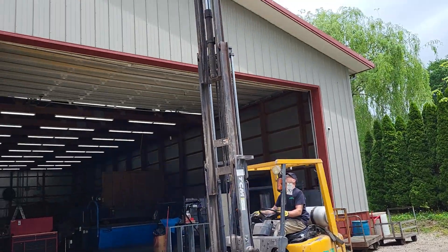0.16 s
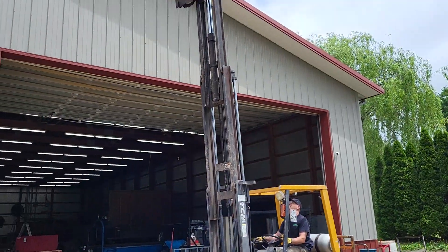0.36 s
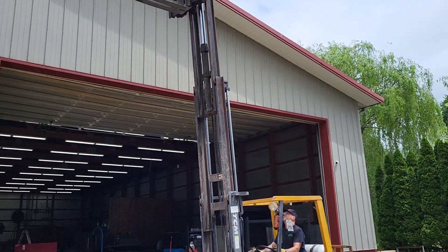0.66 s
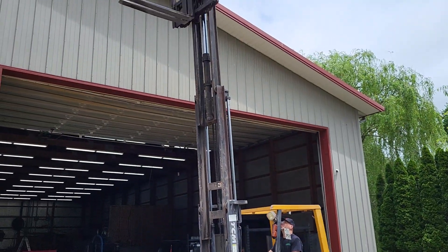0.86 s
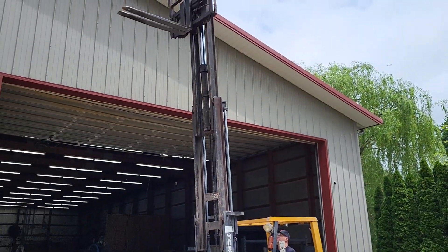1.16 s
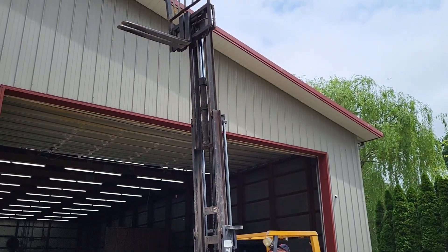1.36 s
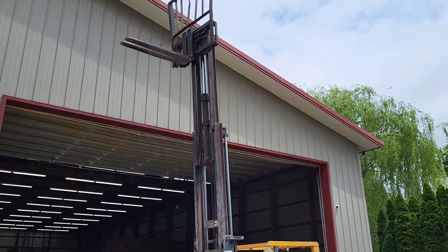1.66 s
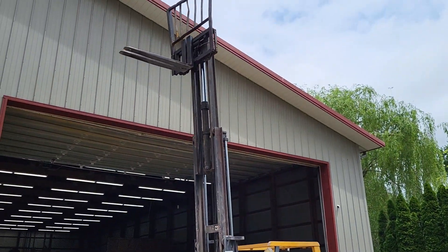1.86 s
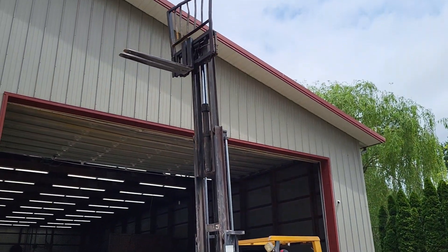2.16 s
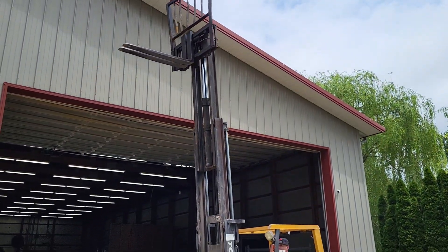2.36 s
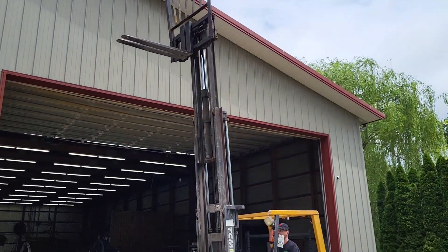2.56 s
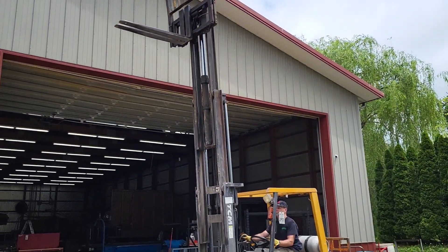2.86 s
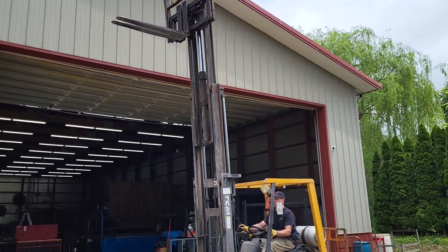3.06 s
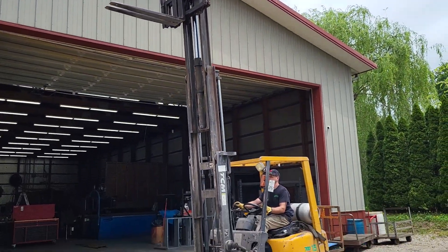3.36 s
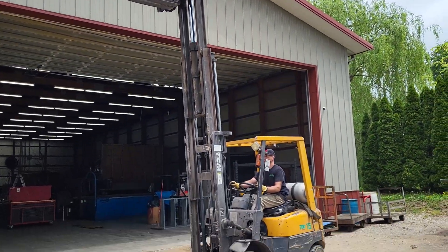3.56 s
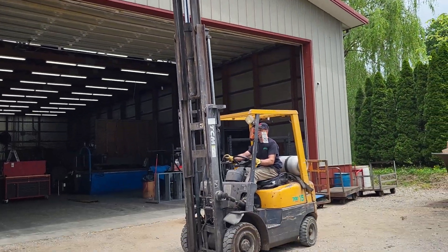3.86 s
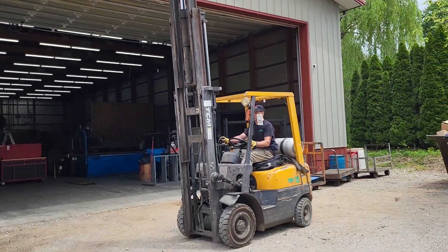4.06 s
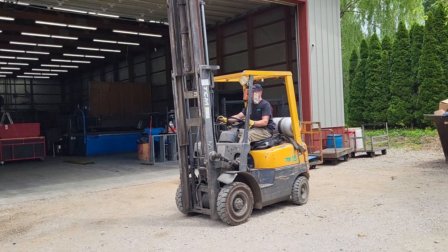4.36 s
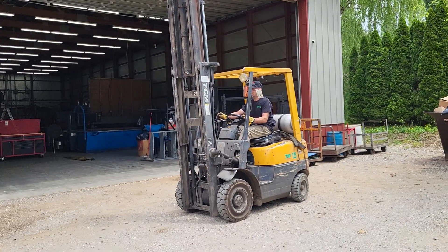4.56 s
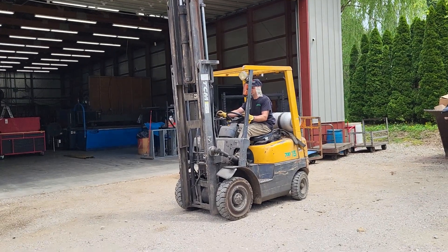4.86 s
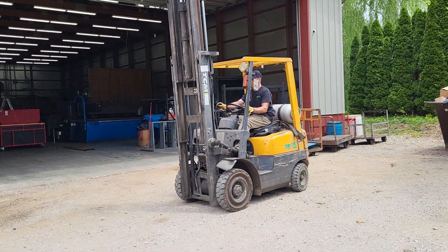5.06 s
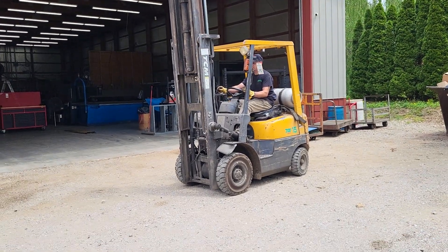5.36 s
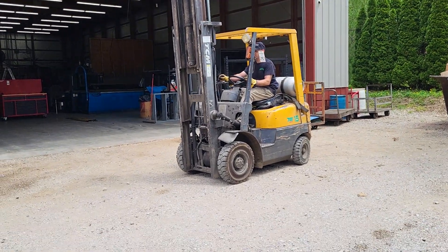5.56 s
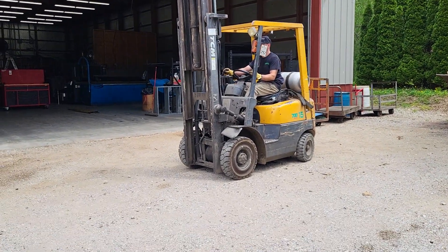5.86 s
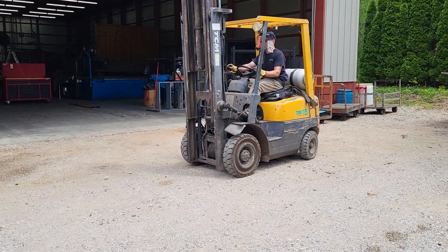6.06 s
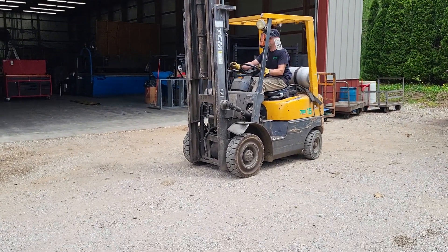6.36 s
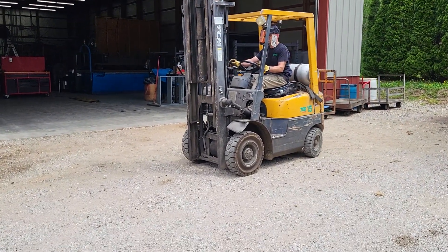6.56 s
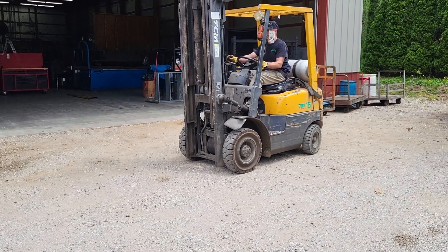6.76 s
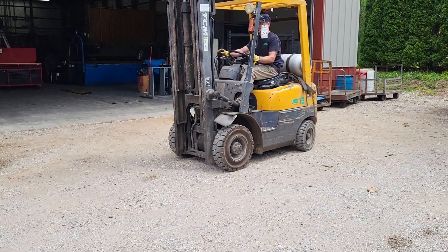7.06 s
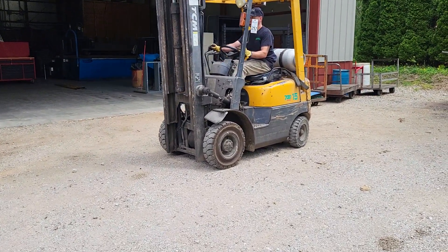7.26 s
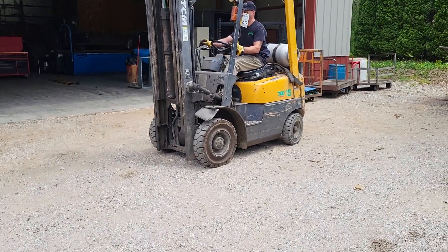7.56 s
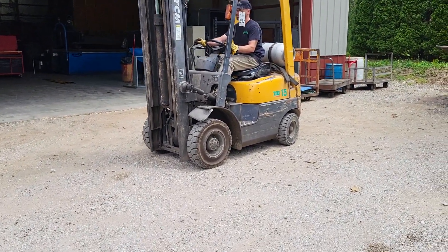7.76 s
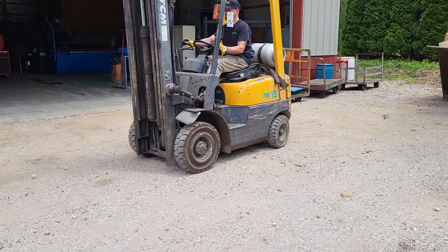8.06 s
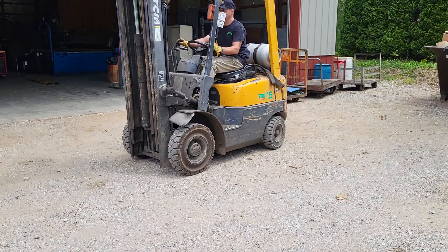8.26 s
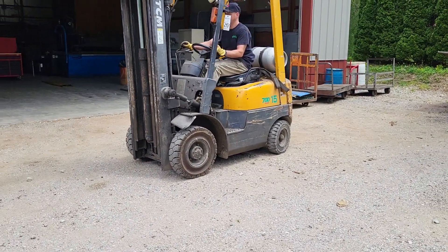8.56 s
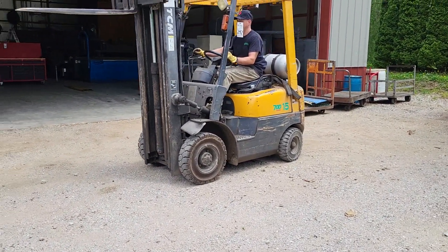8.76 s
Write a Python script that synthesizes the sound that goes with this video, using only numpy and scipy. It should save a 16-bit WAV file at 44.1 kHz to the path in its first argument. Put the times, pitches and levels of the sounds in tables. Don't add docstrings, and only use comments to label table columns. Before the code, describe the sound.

A forklift motor strains upward in pitch, exhaust ringing, fan humming, and intake hissing, with a cluster of metallic clanks in the first second or so. It holds high, then is let off and slides down in about two seconds, burning unevenly before evening out. A steady, puttering idle continues to the end, with small clicks and faint high roller squeaks. Open yard before a shed, microphone fairly near, light echo.

```python
import sys
import numpy as np
from scipy import signal
from scipy.fft import rfft, irfft, next_fast_len
from scipy.io import wavfile

SR = 44100
rng = np.random.default_rng(int(sys.argv[2]) if len(sys.argv) > 2 else 0)


def invert_db(x):
    u = np.asarray(x, float) / 20
    return 10 ** u


def put_to_file(sound):
    columns = np.atleast_2d(sound).T
    safe = np.clip(columns, -1, 1)
    whole_steps = np.round(safe * 32767)
    wavfile.write(sys.argv[1], SR, whole_steps.astype(np.int16))


N = 392931

# time in seconds, firing rate in Hz, exhaust pulse level in dB.
REVS = [(0, 51.8, -19), (.55, 62.12, -19), (1.17, 66.61, -18.5), (1.95, 70.95, -18), (2.3, 72.86, -17.5),
        (3.28, 75.53, -17.5), (3.4, 71.65, -19.5), (3.67, 63.95, -16), (3.82, 58.76, -20.5),
        (4.0, 54.75, -21), (4.2, 49.14, -27), (4.47, 44.53, -26), (4.81, 38.83, -23), (5.26, 35.13, -17),
        (5.5, 33.48, -16), (5.95, 31.01, -18.5), (6.2, 30.41, -17), (8.91, 30.37, -17)]
IDLE_HZ, FULL_HZ = 30, 75
# time in seconds, spread of burn strength in dB.
MISFIRE = [
    (0, .7),
    (3.3, .7),
    (3.4, 3),
    (4.0, 3),
    (4.15, 4.5),
    (4.65, 4.5),
    (4.9, 2.5),
    (5.4, 1),
    (8.91, .7),
]
# pulse in dB, lag in ms, kick into the pipe in dB.
CYLINDERS = [(7, -0.099, -12.5), (8.5, 0.16, -1), (7.5, -0.48, -29), (4.5, 0.18, -32)]
# pitch in Hz, width in Hz, level at idle in dB, level at full revs in dB.
PIPE = [(190, 35, -13, -4.5), (224.6, 12.5, 5, -2), (261, 29.8, -10.5, -0.5), (312.7, 28, -10.5, -5.5),
        (348, 14.3, -9.5, -4.5), (420.4, 13, -26.5, -6), (514.6, 22, -51, -18)]
RING_IDLE_DB, RING_FULL_DB = -1.27, -3
RING_GAIN_DB = 0.93

BOOM_PHASE = [0.15, 0.1]
# firing rate in Hz, level in dB.
FIRST_ORDER = [(30, -61), (40, -36), (50, -28), (58.5, -8.5), (61.7, -12.5), (64.5, -20.5), (70.5, -24),
               (75.5, -22)]
# firing rate in Hz, level in dB.
SECOND_ORDER = [(30.4, -18.5), (34.5, -25), (39.5, -1), (42.5, -26), (53, -27.5), (63.5, -31.5),
                (66.5, -19), (75.5, -22)]
UNBURNT_LOSS_DB = 9.5
GULP_S, GULP_LENGTH_S, GULP_DB = 3.4, 0.11, 11.5

# multiple of firing rate, resonance in Hz, width in Hz, level in dB.
SINGING = [(2.999, 226.5, 44.3, -19.5), (3.251, 257, 50, -29.5), (3.5, 276.4, 30.2, -22),
           (3.749, 272.7, 24.8, -23), (4.001, 244, 45.8, -24.5)]
SINGING_LOSS_DB = 4

# multiple of firing rate, level in dB.
WHINE = [(21.9, 1), (28, -4.5), (29.2, -11), (35, -8.5), (36.5, -8.5), (42, -1), (43.8, -4.5), (51.1, -0.5),
         (54.6, -6)]
# pitch in Hz, width in Hz, level in dB.
HOOD = [(1290, 160, -16), (1642, 75, -5), (3380, 200, -25)]
# multiple of firing rate, housing pitch in Hz, width in Hz, level in dB.
PUMP = (28, 2050, 178.5, -7)
# time in seconds, whine level in dB.
LOAD = [(0, -55), (.62, -31), (3.3, -28.5), (3.85, -23.5), (4.74, -29), (4.95, -44.5), (5.63, -34.5),
        (6.11, -59.5), (7.6, -47), (8.0, -40.5), (8.45, -39), (8.7, -50)]

FAN_ORDER = 7.3
# harmonic number, level over the clatter in dB.
FAN_TONES = [(1, -16), (2, -17), (3, -23), (4, -24)]

# frequency in Hz, density in dB per Hz.
CLATTER = [(280, 12.5), (450, 4), (590, -8.5), (805, 2), (1500, -1.5), (1640, 5), (1850, -8), (2070, 2.5),
           (2540, -13.5), (3200, -30), (4160, -47.5), (7040, -120)]
CLATTER_IDLE_DB, CLATTER_FULL_DB = -37.5, -24.5
# frequency in Hz, density in dB per Hz.
HISS = [(1410, -30), (2400, 0.5), (2860, -30), (3170, -10.5), (4640, -7), (5840, -8.5), (6790, -8.5),
        (8610, -24), (12500, -24), (16000, -27)]
HISS_SHUT_DB, HISS_OPEN_DB = -61, -43
# time in seconds, share from 0 to 1.
INTAKE = [
    (0, 0.96),
    (3.47, 1),
    (4.0, .5),
    (5.05, 0.12),
    (5.6, 0.44),
    (8.91, 0.36),
]
# pitch in Hz, width in Hz, level in dB.
PANELS = [(905, 190, -11.5), (1290, 55, -0.5), (1645, 5.7, -7), (2020, 120, -11), (3970, 69, -20),
          (5730, 80, -16.5)]

# start in seconds, peak in dB, length in seconds, brightness in dB.
CLANKS = [(0.24, -33, 0.025, -3.5), (0.344, -42, 0.0086, 4), (0.408, -24.5, 0.041, 1.5),
          (0.439, -15.5, 0.032, -3.5), (0.462, -14, 0.0088, -3.5), (0.559, -25.5, 0.018, 8),
          (0.709, -35.5, 0.03, 14), (0.873, -40, 0.048, 9.5), (1.136, -33, 0.015, 7),
          (1.174, -12, .02, -10), (4.479, -41, .03, 6), (5.765, -36, .02, 2), (7.8, -36, .012, 0),
          (8.55, -36, .012, 0), (6.841, -33, 0.011, -0.5), (6.914, -33, 0.0065, 1.5),
          (7.135, -34, 0.008, 2), (8.723, -41.5, 0.0068, 11), (8.805, -35, 0.0028, 5.5)]
# pitch in Hz, width in Hz, level in dB.
MAST = [(665, 130, 1.5), (1405, 64, 6.5), (1850, 168, 4), (2274, 330, -1), (4180, 2000, -15),
        (6280, 1500, -15), (13500, 2000, -33)]
# delay in ms, level in dB.
SHED_ECHOES = [(23, -2.5), (41, -14), (67, -24.5), (96, -32)]

# start in seconds, length in seconds, pitch in Hz, level in dB.
SQUEAKS = [
    (1.45, 0.048, 13500, -61),
    (1.483, 0.023, 9000, -47),
    (1.97, 0.045, 13400, -59.5),
    (2.115, .045, 13960, -70),
    (7.18, 0.012, 15800, -62.5),
    (7.74, 0.09, 13550, -59),
    (7.86, 0.12, 14700, -49.5),
    (8.02, 0.16, 14500, -55),
    (8.05, .14, 7500, -59),
]
# start in seconds, length in seconds, pitch in Hz, level in dB.
WHISTLES = [
    (1.15, 0.3, 15400, -71),
    (5.12, 0.11, 13950, -81),
]
# start
# in seconds, length in seconds, pitch in Hz, level in dB.
RUSTLES = [(0, .3, 1290, -32), (.2, .25, 1290, -32), (7.85, .3, 14700, -59), (1.14, .25, 10300, -53.5),
           (1.15, .24, 11900, -54.5), (5.62, .09, 13500, -65), (5.62, .09, 7740, -60),
           (6.25, .015, 11760, -66), (7.02, 0.028, 13100, -62), (7.22, .012, 12800, -62.5),
           (8.48, 0.02, 13450, -55), (8.81, 0.043, 14800, -56.5), (8.791, 0.023, 7600, -50)]
SQUEAK_WIDTH, SQUEAK_RISE, WHISTLE_WIDTH, RUSTLE_WIDTH = .035, .055, 0.055, 0.14

# frequency in Hz, density in dB per Hz.
AIR = [(1470, -28.5), (2500, -5), (3660, -9), (4020, -10), (5650, -21), (6350, -37.5), (7420, -21.5),
       (14000, -23.5), (16000, -20.5)]
AIR_DB = -49.5
# frequency in Hz, left-right likeness from 0 to 1.
LIKENESS = [(60, 0.75), (250, 1), (500, 0.73), (1000, 0.64), (2000, 0.39), (4000, 0.021), (8000, 0.018),
            (14000, 0.02)]
LEFT_DB = .35


def rms_one(x):
    return x / np.sqrt(np.mean(x ** 2) + 1e-20)


def in_time(rows):
    s, *columns = np.transpose(rows)
    return [np.interp(np.arange(N) / SR, s, c) for c in columns]


def at_hz(points, hz):
    table_hz, db = np.transpose(points)
    return np.interp(np.log(hz), np.log(table_hz), db)


def with_revs(idle, full, firing):
    return idle + (full - idle) * (firing - IDLE_HZ) / (FULL_HZ - IDLE_HZ)


def drift(rate):
    r = np.exp(-80 * np.pi * rate / SR)
    slow = signal.lfilter([1], [1, -2 * r, r * r], rng.standard_normal(N // 40 + 2002))[2000:]
    return np.interp(np.arange(N) / 40, np.arange(len(slow)), rms_one(slow))


def resonate(x, hz, width_hz):
    r = np.exp(-np.pi * width_hz / SR)
    poles = [1, -2 * r * np.cos(2 * np.pi * hz / SR), r * r]
    return signal.lfilter(np.array([1, 0, -1]) * (1 - r * r) / 2, poles, x + 1e-18)


def body(x, modes):
    return sum((-1) ** k * invert_db(db) * resonate(x, hz, width) for k, (hz, width, db) in enumerate(modes))


def stereo_noise(spectrum, patchy_db):
    size = next_fast_len(N)
    hz = np.maximum(np.fft.rfftfreq(size, 1 / SR), 1)
    alike = np.clip(at_hz(LIKENESS, hz), 0, 1)
    coloured = rfft(rng.standard_normal((2, size))) * invert_db(at_hz(spectrum, hz))
    mid, side = coloured * np.sqrt([1 + alike, 1 - alike])
    left_right = np.array([mid + side, mid - side])
    together = drift(7.2)
    edges = np.geomspace(spectrum[0][0], spectrum[-1][0], 5)
    out = 0
    for low, high in zip(edges, edges[1:]):
        band = irfft(left_right * ((hz >= low) & (hz < high)), size)[:, :N]
        out = out + band * invert_db(patchy_db * (.8 * together + drift(14.0)))
    return rms_one(out)


def boom_levels(firing):
    gulp = np.exp(-((np.arange(N) / SR - GULP_S) / GULP_LENGTH_S) ** 2)
    uneven_db = in_time(MISFIRE)[0]
    first_db = at_hz(FIRST_ORDER, firing) + GULP_DB * gulp
    second_db = at_hz(SECOND_ORDER, firing) - UNBURNT_LOSS_DB * (uneven_db - uneven_db.min())
    return first_db, second_db


def silencer_boom(turns, firing):
    boom = np.zeros(N)
    for k, db in enumerate(boom_levels(firing)):
        order = np.cos(2 * np.pi * (k + 1) * turns - BOOM_PHASE[k])
        boom += np.sqrt(2) * invert_db(db + 2.2 * drift(11.0)) * order
    return boom


def exhaust(turns, firing, pulse_db):
    at = np.flatnonzero(np.diff(np.floor(turns)))
    chance = rng.standard_normal((len(at), 3))
    misfire_db = in_time(MISFIRE)[0]
    revs = with_revs(0, 1, firing)
    cylinder_db, lag_ms, kick_db = np.array(CYLINDERS)[np.arange(len(at)) % 4].T
    lag = (lag_ms + .1 * misfire_db[at] * chance[:, 1]) * SR / 1000
    at_late = np.clip(at + lag.astype(int), 0, N - 1)

    slugs, kicks, ring = np.zeros((3, N))
    slugs[at_late] = invert_db(cylinder_db + misfire_db[at] * chance[:, 0]) / np.sqrt(firing[at])
    slugs = signal.sosfiltfilt(signal.butter(2, [66, 235], "band", fs=SR, output="sos"), slugs)
    slugs = slugs + 0.67 * resonate(slugs, 97.6, 16)

    for k, (hz, width, idle_db, full_db) in enumerate(PIPE):
        uneven = np.roll(kick_db, k) * (1 - 0.4 * revs[at])
        kicks[at_late] = invert_db(uneven + misfire_db[at] * chance[:, 2]) / np.sqrt(firing[at])
        mode = resonate(resonate(kicks, hz, width), hz, 4 * width)
        ring += invert_db(with_revs(idle_db, full_db, firing)) * mode
    ring_db = with_revs(RING_IDLE_DB, RING_FULL_DB, firing) + RING_GAIN_DB * misfire_db

    rumble = rms_one(resonate(resonate(rng.standard_normal(N), 170, 85), 190, 99))
    blast = invert_db(-2.0) * rms_one(slugs) + invert_db(ring_db - 3.0) * rms_one(ring)
    return invert_db(pulse_db) * (blast + invert_db(-13 + 2.94 * misfire_db) * rumble)


def singing(turns, firing):
    even = np.sqrt(2) * invert_db(1.1 * drift(2.7) - SINGING_LOSS_DB * in_time(MISFIRE)[0])
    orders = np.zeros(N)
    for k, hz, width, db in SINGING:
        closeness = 1 / (1 + (2 * (k * firing - hz) / width) ** 2)
        orders += invert_db(db) * closeness * np.cos(2 * np.pi * k * turns)
    return even * orders


def whine(turns, whine_db):
    turns = turns + .002 * drift(5.0)
    tones = sum(invert_db(db + 2.0 * drift(3.2)) * np.sin(2 * np.pi * k * turns) for k, db in WHINE)
    multiple, hz, width_hz, db = PUMP
    gear = np.sin(2 * np.pi * multiple * turns)
    pump = invert_db(db + 0.67 * drift(3.2)) * resonate(resonate(gear, hz, width_hz), hz, width_hz)
    hood = sum(invert_db(db) * resonate(resonate(tones, hz, width), hz, 1.6 * width) for hz, width, db in HOOD)
    return invert_db(whine_db) * (hood + pump) * 2


def fan(turns, clatter_db):
    turns = turns + .012 * drift(6.0)
    tones = np.zeros(N)
    for k, db in FAN_TONES:
        tones += invert_db(db + 4.0 * drift(5.0)) * np.sin(2 * np.pi * FAN_ORDER * k * turns)
    return np.sqrt(2) * invert_db(clatter_db) * tones


def machinery(turns, clatter_db, hiss_db):
    throb = (1 + 0.17 * np.cos(2 * np.pi * turns)) * invert_db(0.46 * drift(18.0))
    clatter = stereo_noise(CLATTER, patchy_db=0.65)
    ringing = body(rng.standard_normal(N), PANELS[:4])
    rattle = rng.standard_normal(N) * invert_db(3 * drift(18.0) + hiss_db - hiss_db.max())
    hiss = stereo_noise(HISS, patchy_db=0.7) + 0.15 * rms_one(body(rattle, PANELS[4:]))
    return throb * (invert_db(clatter_db) * (clatter + 0.27 * rms_one(ringing)) + invert_db(hiss_db - 2.5) * hiss)


def clanks():
    t = np.arange(N) / SR
    grit = rms_one(rng.standard_normal((2, N)) ** 3)
    dull, bright = np.zeros((2, N))
    for s, db, length, bright_db in CLANKS:
        part = slice(int(s * SR), int((s + 6 * length) * SR))
        shape = invert_db(db) * np.exp(-(t[part] - s) / length)
        dull[part] += shape
        bright[part] += shape * invert_db(bright_db)
    return 2.78 * (body(grit[0] * dull, MAST[:4]) + body(grit * bright, MAST[4:]))


def shed(x):
    dull, out = signal.lfilter([.3], [1, -.7], x), np.zeros((2, N))
    for k, (ms, db) in enumerate(SHED_ECHOES):
        lag = int(ms * SR / 1000)
        sides = invert_db([[-3.5], [3.5]])[::(-1) ** k]
        out[:, lag:] += invert_db(db) * dull[:-lag] * sides
    return out


def squeaks():
    out, flutter = np.zeros((2, N)), invert_db(3.5 * drift(60.0))
    kinds = [(SQUEAKS, SQUEAK_WIDTH, SQUEAK_RISE), (WHISTLES, WHISTLE_WIDTH, 0), (RUSTLES, RUSTLE_WIDTH, 0)]
    for table, width, rise in kinds:
        for s, length, hz, db in table:
            real, imaginary = rng.standard_normal((2, 2, 16000))
            i, n = int(s * SR), int(length * SR)
            r = np.exp(-np.pi * width * hz / SR)
            band = signal.lfilter([1], [1, -2 * r, r * r], real + 1j * imaginary)[:, 2000:2000 + n]
            phase = 2 * np.pi * np.cumsum(hz * (1 + rise * np.linspace(-.5, .5, n))) / SR
            tone = rms_one((band * np.exp(1j * phase)).real)
            out[:, i:i + n] += invert_db(db) * np.sqrt(np.hanning(n)) * flutter[i:i + n] * tone
    return out


def scene():
    firing, pulse_db = in_time(REVS)
    intake, whine_db = in_time(INTAKE)[0], in_time(LOAD)[0]
    clatter_db = with_revs(CLATTER_IDLE_DB, CLATTER_FULL_DB, firing)
    hiss_db = HISS_SHUT_DB + (HISS_OPEN_DB - HISS_SHUT_DB) * intake
    turns = np.cumsum(firing) / SR
    direct = exhaust(turns, firing, pulse_db) + silencer_boom(turns, firing) + singing(turns, firing)
    direct = direct + whine(turns, whine_db) + fan(turns, clatter_db)
    mast = clanks()
    echoes = invert_db(-11.5) * shed(direct + mast[0])
    near = direct + echoes + mast + machinery(turns, clatter_db, hiss_db)
    air = invert_db(AIR_DB) * stereo_noise(AIR, patchy_db=.2)
    return near * invert_db([[LEFT_DB], [-LEFT_DB]]) + squeaks() + air


def band_limit(x):
    return signal.sosfilt(signal.butter(12, 15800, fs=SR, output="sos"), x)


def record(dry):
    x = signal.sosfilt(signal.butter(2, 35, "high", fs=SR, output="sos"), dry)
    return band_limit(1.092 * np.tanh(x / 1.401))


dry = scene()
out = record(dry)
put_to_file(out)
```